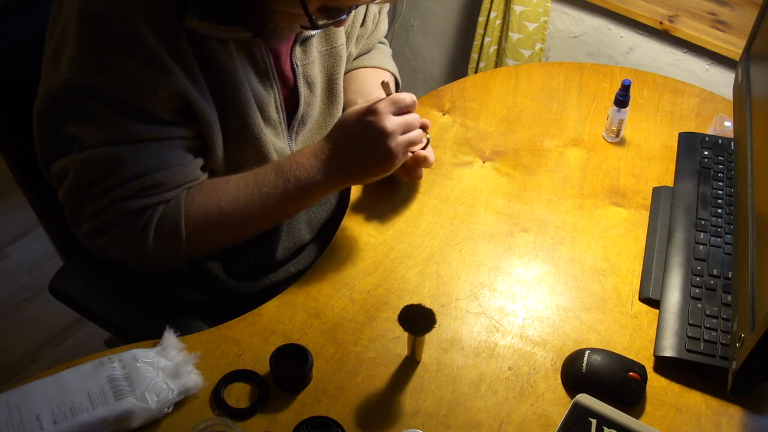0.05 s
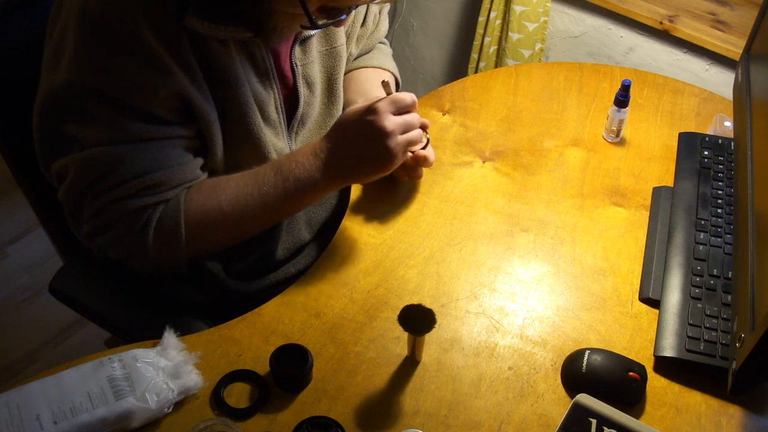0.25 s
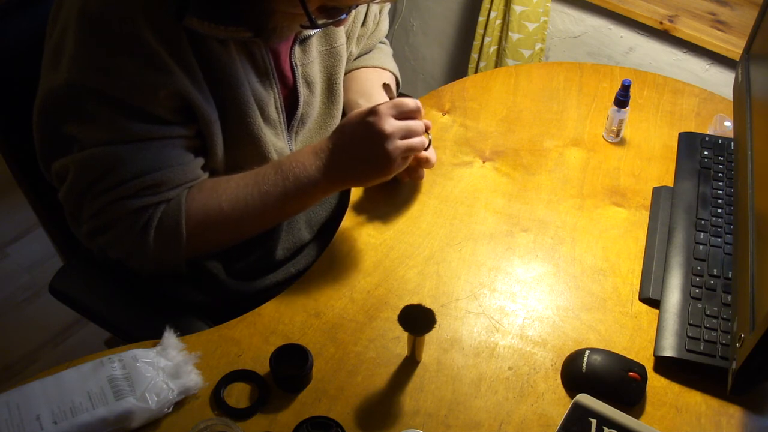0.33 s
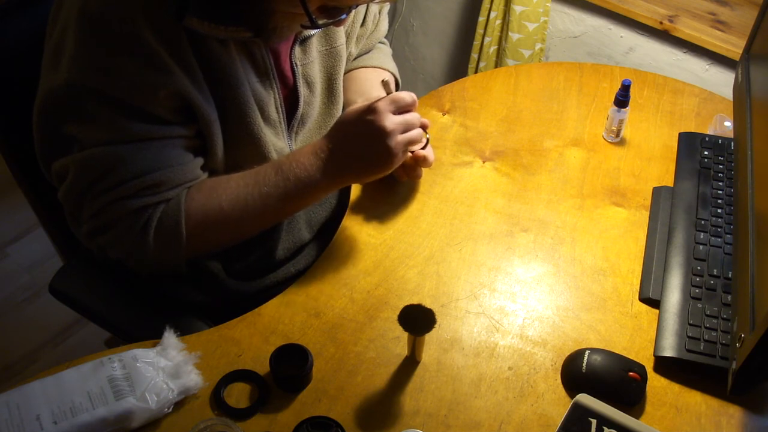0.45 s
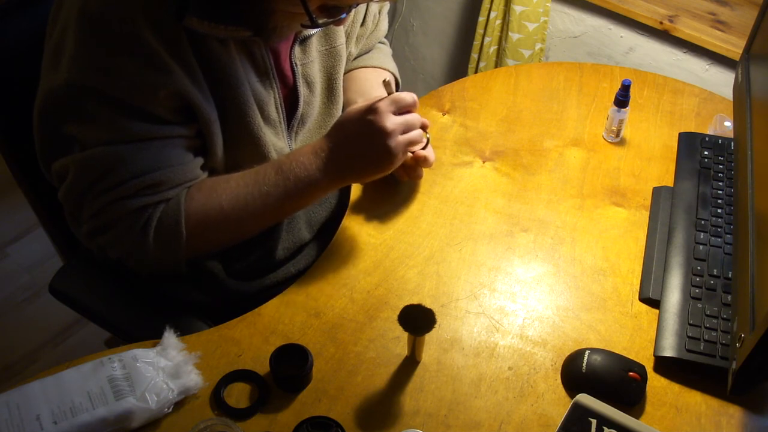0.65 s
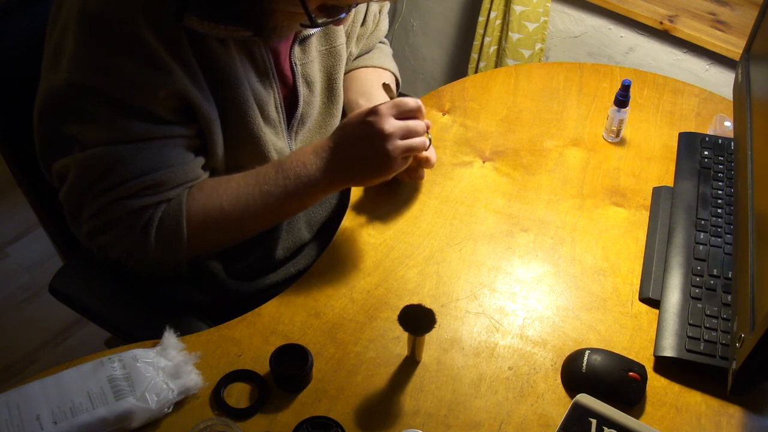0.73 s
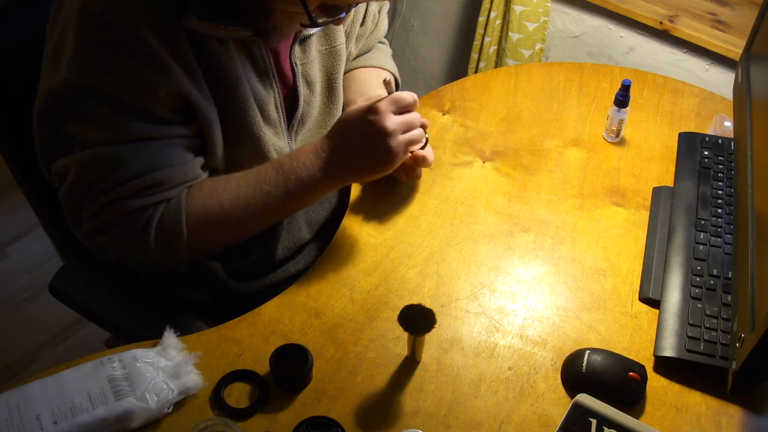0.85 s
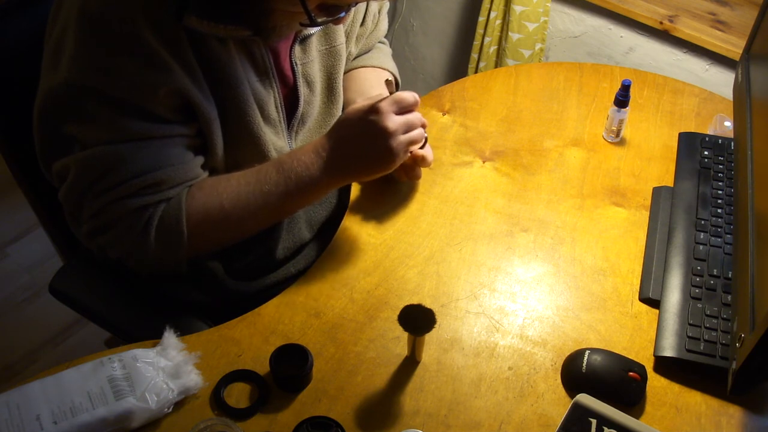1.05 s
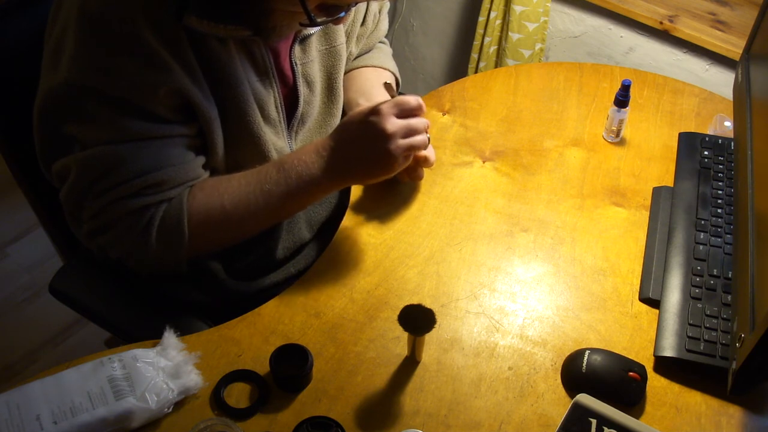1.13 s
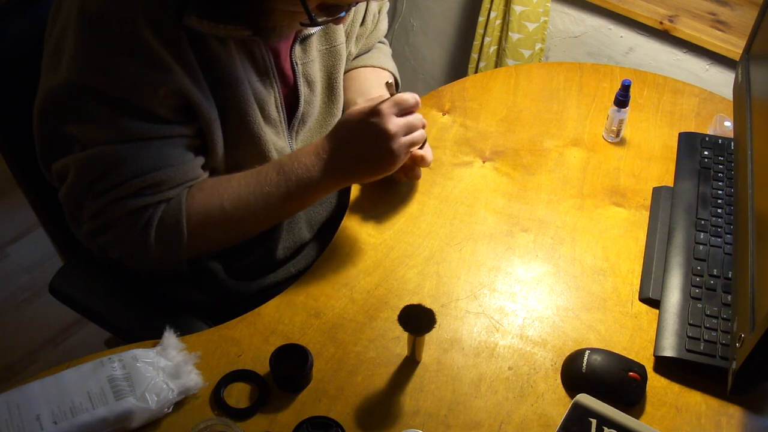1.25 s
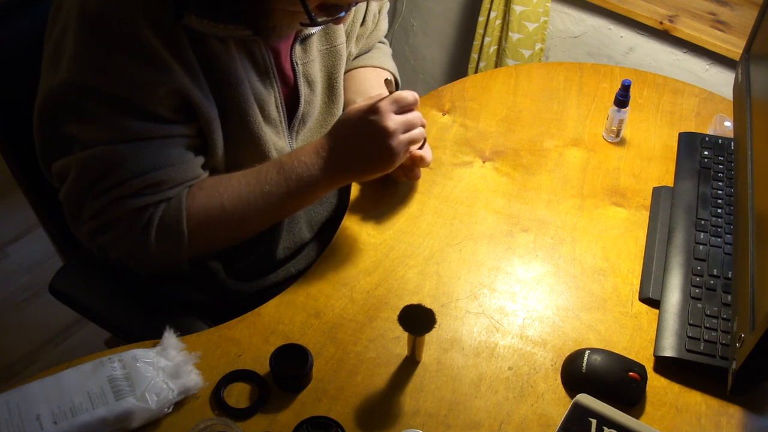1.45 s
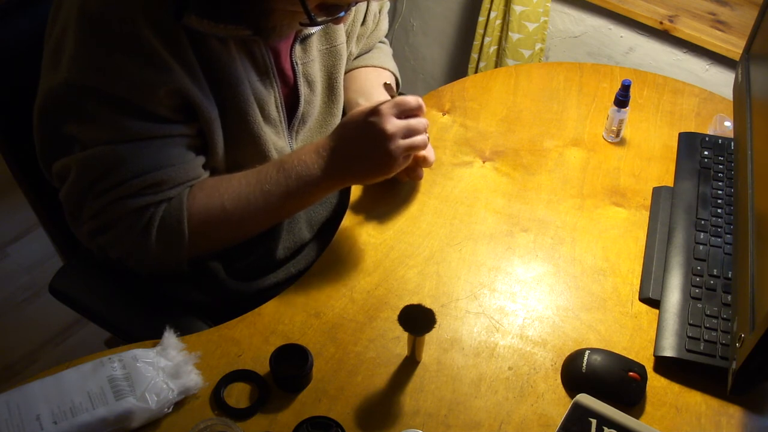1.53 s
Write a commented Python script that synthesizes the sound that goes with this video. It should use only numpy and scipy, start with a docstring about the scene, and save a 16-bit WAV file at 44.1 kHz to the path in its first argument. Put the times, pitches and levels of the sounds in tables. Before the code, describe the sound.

High, uneven squeaks come in a quick rhythm as a finger wipes a small glass filter, each stroke with a soft swish. The sound is close, in a small room over a quiet, constant hiss.

```python
"""A small glass filter is rubbed clean by hand at a table, about five strokes a second.
Each stroke hisses softly and grips the glass in a short stick-slip squeak near 3 kHz
that sags as the finger slows. Lighter contact gives weaker squeaks and lower, rising chirps.
A small room rings behind, over a steady hiss."""
import sys
import numpy as np
from scipy import signal
from scipy.fft import rfft, irfft
from scipy.io import wavfile

SR = 44100
rng = np.random.default_rng(int(sys.argv[2]) if len(sys.argv) > 2 else 0)


def put_to_file(sound):
    """Save the sound as 16-bit audio at rate SR, in the file named by the first command-line argument."""
    columns = np.atleast_2d(sound).T  # one column per channel
    safe = np.clip(columns, -1, 1)
    whole_steps = np.round(safe * 32767)
    wavfile.write(sys.argv[1], SR, whole_steps.astype(np.int16))


N = 70560  # 1.6 s


def amp(db):
    """Decibels to gain."""
    return 10 ** (np.asarray(db) / 20)


def unit(x):
    """Scales to rms 1."""
    return x / np.sqrt(np.mean(x ** 2) + 1e-20)


def curve(points):
    """Draws a smooth-running curve through the points, over the spectrum on a log-frequency axis."""
    hz, value = np.transpose(points)
    return np.interp(np.log(np.fft.rfftfreq(N, 1 / SR) + 1), np.log(hz + 1), value)


def pan(db):
    """Left and right gains; positive dB leans left."""
    return amp([[db / 2], [-db / 2]])


def add(mix, start, sound, pan_db=0):
    """Places a sound in the stereo mix."""
    part = mix[:, round(start * SR):][:, :sound.shape[-1]]
    part += (pan(pan_db) * sound)[:, :part.shape[1]]


def flutter(size, corner_hz=430):
    """Smooth random unsteadiness of the grip."""
    hz = np.fft.rfftfreq(8192, 1 / SR)
    spectrum = rfft(rng.standard_normal(8192)) / (1 + (hz / corner_hz) ** 2)
    return unit(irfft(spectrum))[:size]


def noise(colour, likeness, balance_db=0):
    """Stereo noise with a given tone colour, left-right correlation and balance."""
    left, spread = rfft(rng.standard_normal((2, N)))
    right = likeness * left + np.sqrt(1 - likeness ** 2) * spread
    pair = np.array([left * amp(balance_db / 2), right * amp(-balance_db / 2)])
    return unit(irfft(pair * amp(curve(colour)), N))


# Finger slides. Each row: start in seconds, rise and fall in seconds, peak level in dB.
SLIDES = [(.0, .025, 0.048, -52.5), (0.113, 0.016, 0.029, -70), (0.208, .010, 0.03, -48),
          (0.236, 0.01, 0.037, -56.5), (0.403, 0.0062, .05, -50.5), (.598, 0.0031, 0.051, -49),
          (.735, 0.0085, 0.02, -56.5), (0.779, .01, .03, -58), (0.81, 0.017, 0.052, -55.5),
          (0.873, 0.006, 0.019, -57), (0.919, 0.011, 0.052, -53.5), (0.998, 0.019, 0.056, -54),
          (1.124, .01, 0.033, -54.5), (1.232, .008, 0.013, -53), (1.28, .012, 0.02, -60.5),
          (1.406, 0.0027, 0.042, -53), (1.5, 0.017, 0.034, -72)]
# The bright tone of the friction. Each row: frequency in Hz, relative level in dB.
SLIDE_EQ = [(100, -24), (1500, -13.5), (2500, 0.5), (4000, -1.5), (5500, 1.5), (7000, -1), (9000, 0),
            (10000, -8), (11000, -27.5), (14000, -19.5)]


def rubbing(grain_db=2.5):
    """The finger slides over the glass: a grainy hiss that swells and dies with each stroke."""
    envelope = np.zeros((2, N))
    for start, rise, fall, level_db in SLIDES:
        t = np.arange(0, rise + fall, 1 / SR)
        stroke = np.interp(t, [0, rise, rise + fall], [0, 1, 0])
        add(envelope, start, stroke * amp(level_db + grain_db * flutter(len(t))))
    return envelope * noise(SLIDE_EQ, likeness=0.23)


# Tone of the background bed. Each row: frequency in Hz, relative level in dB.
HISS_EQ = [(20, -7), (45, -6), (70, -3.5), (110, 2.5), (170, 8), (210, 7.5), (260, 7.5), (400, 5.5),
           (850, 3.5), (1080, 9), (1270, 12.5), (1550, 0.5), (2300, 2.5), (3500, -2), (6000, -5.5),
           (9300, -8), (10200, -16), (11000, -50), (12400, -29), (13200, -18), (14200, -29)]
# Its stereo width. Each row: frequency in Hz, left-right correlation from -1 to 1.
HISS_WIDTH = [(30, 0.35), (100, -0.47), (250, -0.52), (600, -0.41), (1200, -0.8), (2500, -0.16),
              (6000, 0.049), (13000, 0.17)]
# Its lean. Each row: frequency in Hz, left over right in dB.
HISS_PAN = [(60, -2), (300, 1.1), (600, 0.5), (1200, 7.5), (2200, 2), (5000, 1), (9000, 0), (13000, -7.5)]


def room_hiss():
    """A steady, wide bed of room hiss with a soft hump near 1.2 kHz on the left."""
    return amp(-51) * noise(HISS_EQ, curve(HISS_WIDTH), curve(HISS_PAN))


def slip_phase(hz, jitter=0.0042):
    """Phase of a friction tone whose pitch wavers with the grip."""
    return 2 * np.pi * np.cumsum(hz * (1 + jitter * flutter(len(hz)))) / SR


# The finger catching the glass. Each row: start, rise, hold and release in seconds, top pitch and
# full sag in Hz, level in dB, octave against the fundamental in dB, left over right in dB.
GRIPS = [ (.010, 0.009, 0.0037, 0.012, 2650, 60, -53, -41, -1),
         (0.117, 0.01, 0.0032, 0.02, 2890, 60.5, -64.5, -22, 0),
         (0.2094, 0.0045, 0.011, 0.0046, 2908, 160, -32, -14.5, 1.5),
         (0.4006, 0.0094, 0.012, 0.012, 2990, 276, -31.5, -6, 1.5),
         (0.51, 0.02, 0.0024, 0.022, 2880, 200, -50.5, -24, 1),
         (.598, .009, .012, 0.0099, 3048, 281, -28.5, -5.5, 3),
         (.721, .008, 0.0022, 0.015, 2920, 80.5, -58.5, -20, 0.5),
         (0.799, 0.01, 0.017, 0.012, 2999, 260, -30.5, -4.5, 2),
         (.911, .026, 0.0029, 0.01, 2949, 89, -35, -10, 2),
         (1.006, 0.0097, 0.011, 0.041, 2953, 249, -32, -3.5, 1.5),
         (1.121, 0.014, 0.0017, .018, 2902, 220, -38, -8.5, 2),
         (1.226, 0.012, 0.0061, 0.017, 2727, 59, -39, -12, 1.5),
         (1.411, 0.011, 0.014, 0.016, 2953, 194, -31, -7, 1.5)]


def squeaks(scoop_hz=65, scoop_s=0.011, sag_s=0.017, shimmer=0.037):
    """Stick-slip tones: each scoops up to pitch, then sags and loses its octave as the grip loosens."""
    mix = np.zeros((2, N))
    for start, rise, hold, release, top_hz, sag_hz, level_db, octave_db, pan_db in GRIPS:
        length = rise + hold + release
        t = np.arange(0, length, 1 / SR)
        scoop = np.maximum(1 - t / scoop_s, 0) ** 2
        slack = 1 - np.exp(-(np.maximum(t - scoop_s, 0) / sag_s) ** 2.4)
        phase = slip_phase(top_hz - scoop_hz * scoop - sag_hz * slack)
        attack = np.sin(np.pi / 2 * np.minimum(t / rise, 1)) ** 2
        fade = np.clip((length - t) / release, 0, 1) ** 1.66
        swell = attack * fade * (1 + shimmer * flutter(len(t)))
        octave = amp(octave_db - 13 * slack) * pan(-6) * np.sin(2 * phase)  # radiates more to the right
        third_partial = amp(octave_db - 27) * np.sin(3 * phase)
        tone = np.sin(phase) + octave + third_partial
        add(mix, start, np.sqrt(2) * amp(level_db) * swell * tone, pan_db)
    return mix


# Light touches. Each row: start and length in seconds, starting pitch in Hz, level in dB,
# octave against the fundamental in dB.
LOOSE_SLIPS = [(0.195, 0.023, 2660, -52.5, -18), (0.391, 0.02, 2270, -58.5, -18),
               (0.462, 0.041, 2100, -57, -20), (0.768, 0.05, 2173, -47.5, -18.5),
               (0.876, 0.028, 2150, -37, -21), (0.992, 0.02, 2210, -46.5, -14.5),
               (.998, 0.012, 2620, -52, 1), (1.494, 0.023, 2216, -49, -20)]


def chirps(climb_hz_per_s=5360):
    """Lower, looser slips that climb as the finger gathers speed."""
    mix = np.zeros((2, N))
    for start, length, start_hz, level_db, octave_db in LOOSE_SLIPS:
        t = np.arange(0, length, 1 / SR)
        phase = slip_phase(start_hz + climb_hz_per_s * t)
        swell = np.sin(np.pi * t / length) ** 2
        tone = np.sin(phase) + amp(octave_db) * np.sin(2 * phase)
        add(mix, start, np.sqrt(2) * amp(level_db) * swell * tone)
    return mix


def glass(friction, ring_hz=2830, width_hz=143):
    """The held glass resonates, so tones bloom as their pitch crosses its ring."""
    damping = np.exp(-np.pi * width_hz / SR)
    pole = damping * np.exp(2j * np.pi * ring_hz / SR)
    ring = 2 * signal.lfilter([1 - damping], [1, -pole], friction).real
    return friction + amp(-5) * ring


# Near reflections. Each row: delay in seconds, left gain, right gain.
REFLECTIONS = [(.0052, 0.081, 0.078), (0.0117, .08, .1), (0.016, .08, .06)]


def room(direct, predelay_s=0.0096, likeness=0.59, shelf_hz=4200, shelf_db=-1.5):
    """A few near reflections, quick scatter from the table top and a short, duller diffuse tail."""
    t = np.arange(SR // 2) / SR
    response = np.zeros((2, len(t)))
    for t60, level_db in (0.3, -12.5), (0.24, -17):  # room tail, table scatter
        left, spread = rng.standard_normal((2, len(t))) * amp(-60 * t / t60) * (t > predelay_s)
        right = likeness * left + np.sqrt(1 - likeness ** 2) * spread
        response += amp(level_db) * np.array([left, right]) / np.linalg.norm(left)
    treble = 1 - 1 / (1 + (np.fft.rfftfreq(len(t), 1 / SR) / shelf_hz) ** 8)
    response = irfft(rfft(response) * amp(shelf_db * treble), len(t))  # the walls swallow some treble
    for delay, left, right in REFLECTIONS:
        response[:, round(delay * SR)] += left, right
    return signal.fftconvolve(direct, response, axes=1)[:, :N]


def scene():
    """The rubbed glass in its room, over the hiss."""
    direct = glass(squeaks() + chirps()) + rubbing()
    return direct + room(direct) + room_hiss()


def record(dry):
    """A steep high cut near 14 kHz on the whole mix."""
    high_cut = signal.firwin(511, 14050, window=("kaiser", 9), fs=SR)
    return signal.oaconvolve(dry, high_cut[None], "same")


dry = scene()
out = record(dry)
put_to_file(out)
```